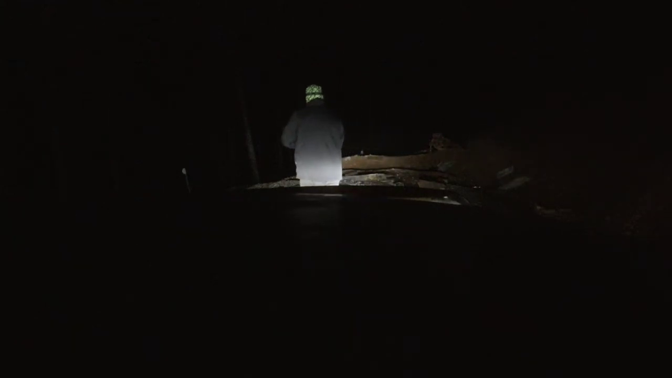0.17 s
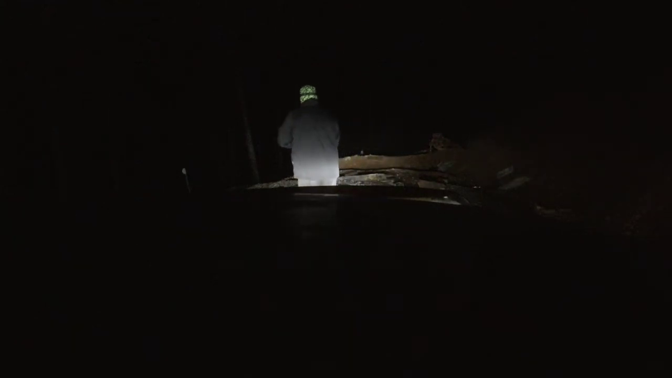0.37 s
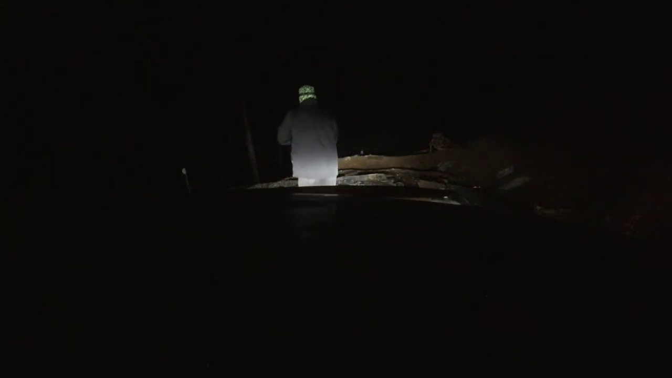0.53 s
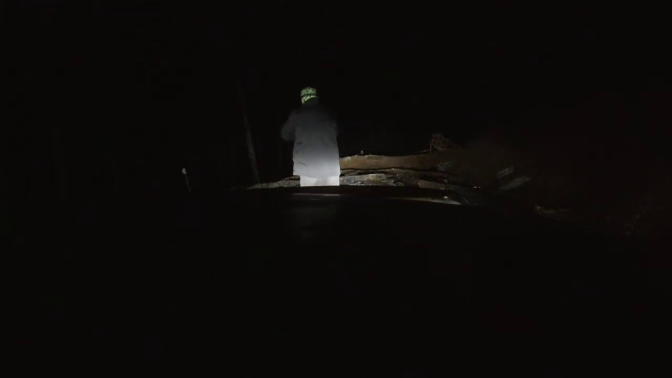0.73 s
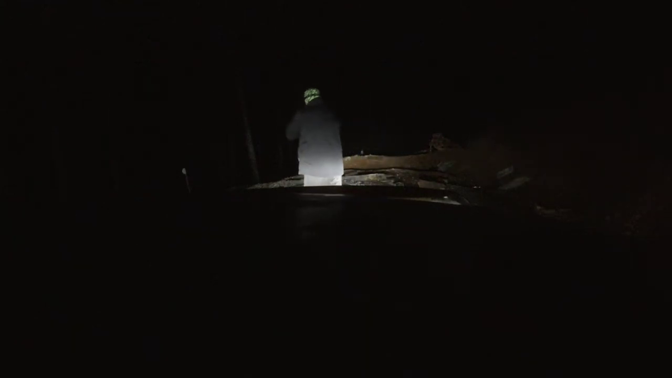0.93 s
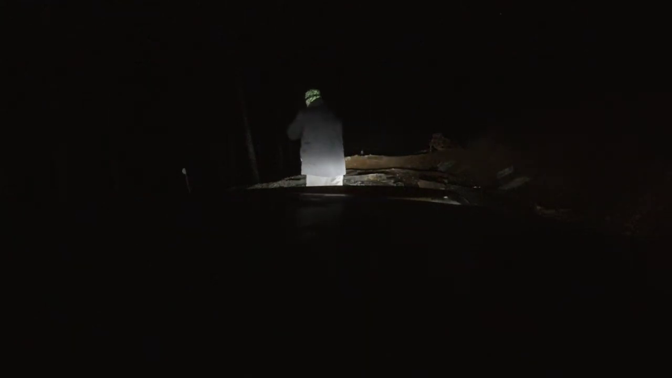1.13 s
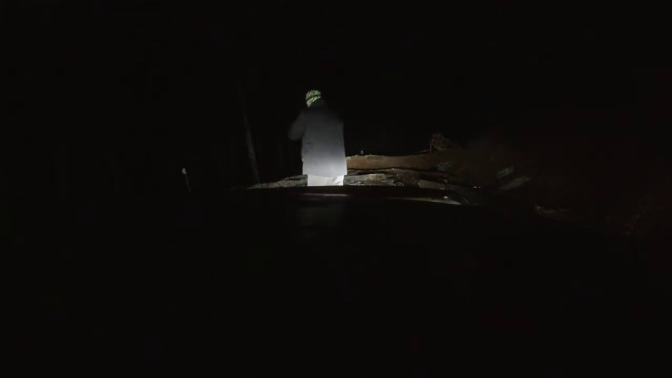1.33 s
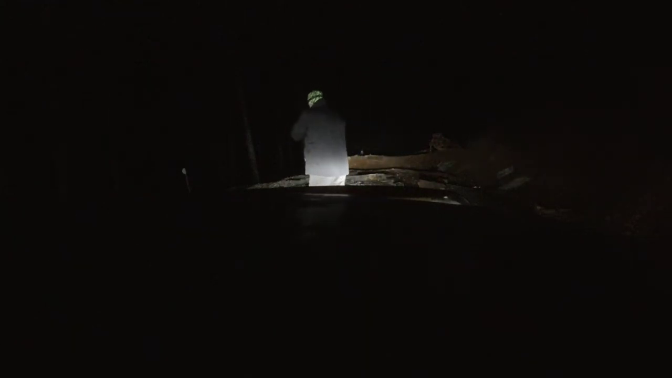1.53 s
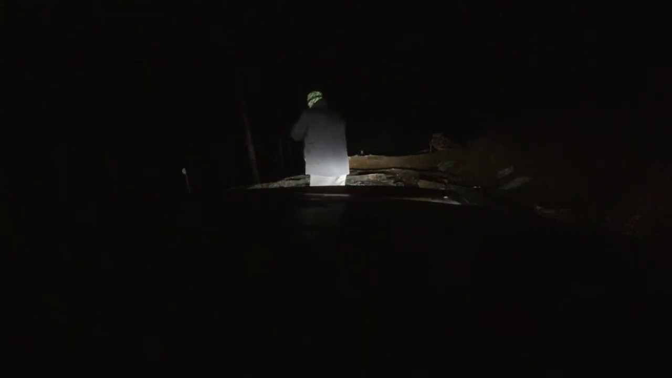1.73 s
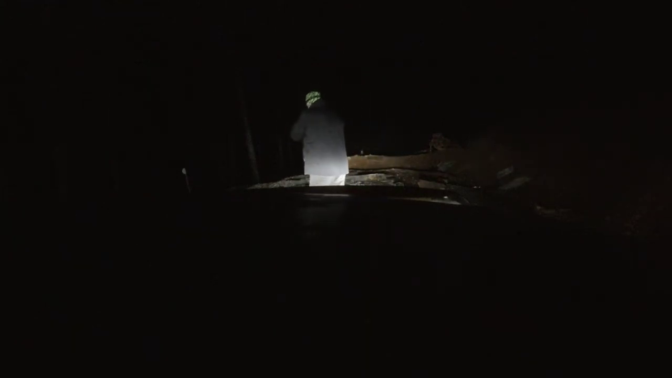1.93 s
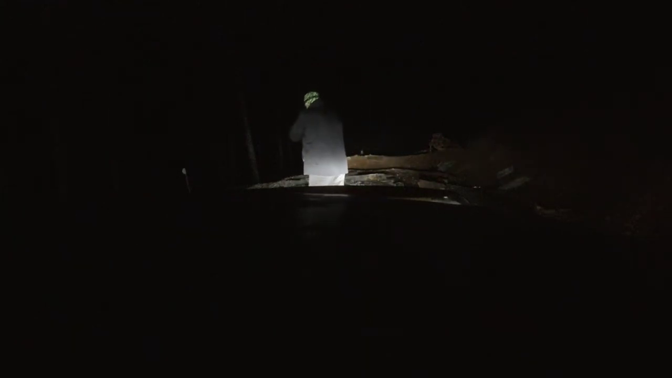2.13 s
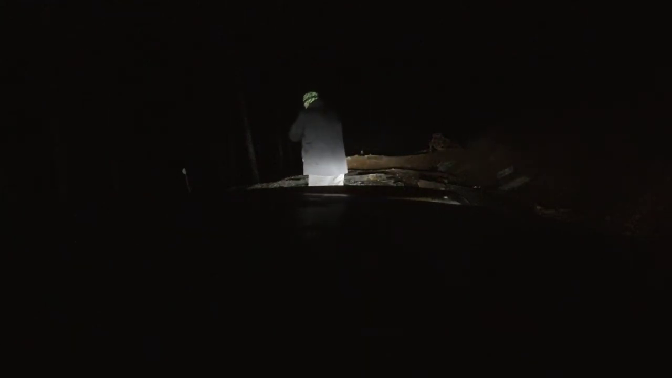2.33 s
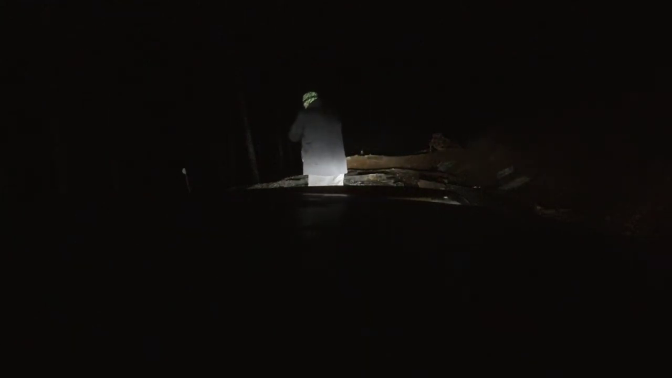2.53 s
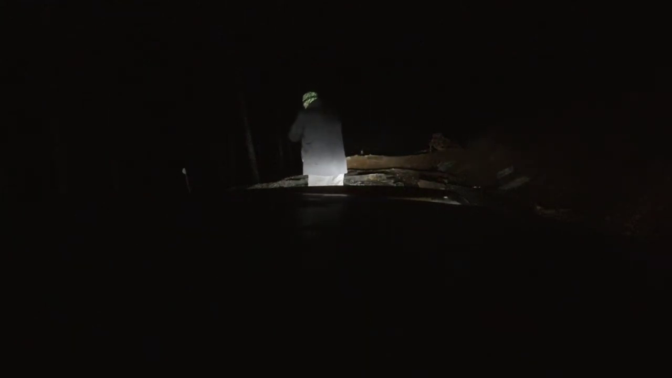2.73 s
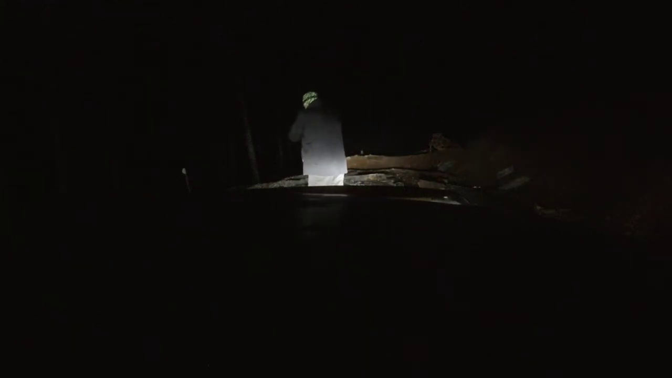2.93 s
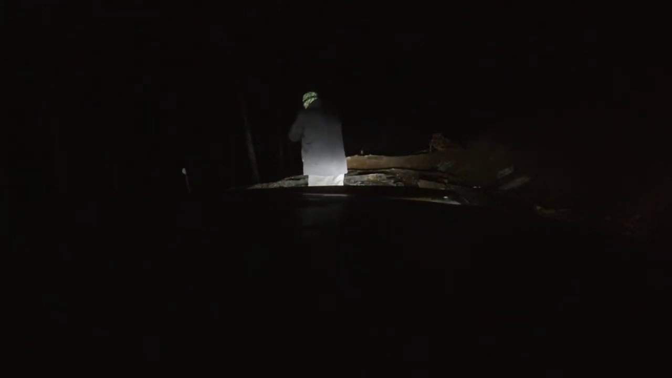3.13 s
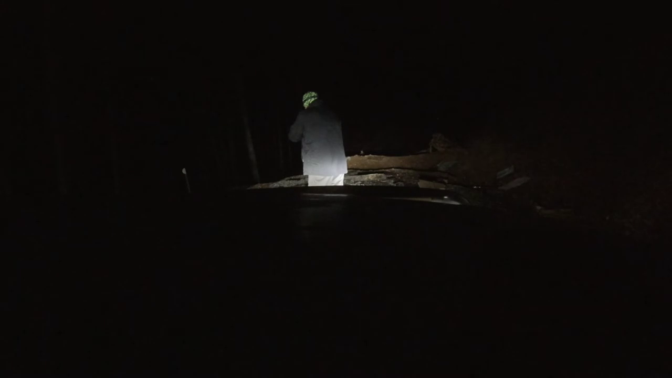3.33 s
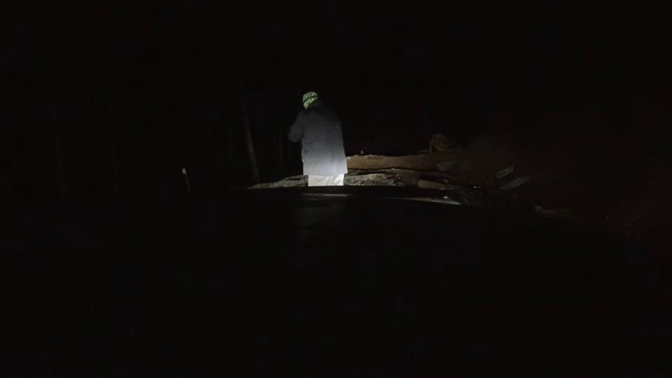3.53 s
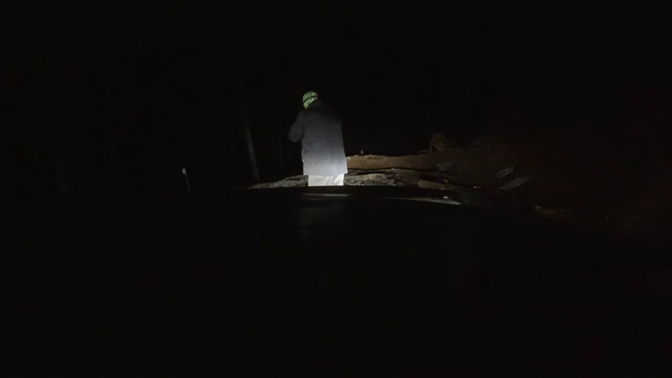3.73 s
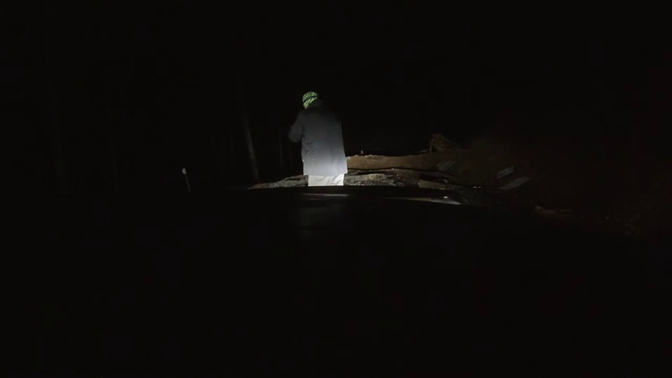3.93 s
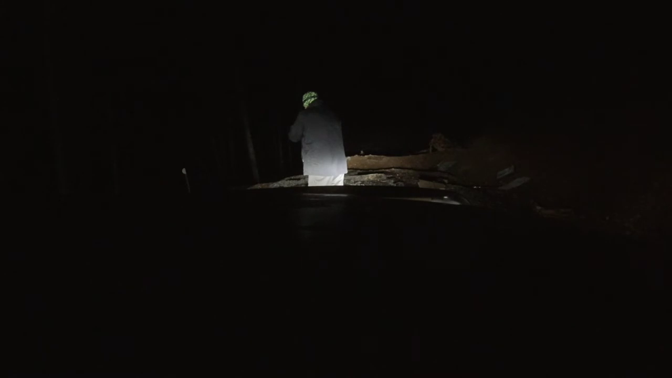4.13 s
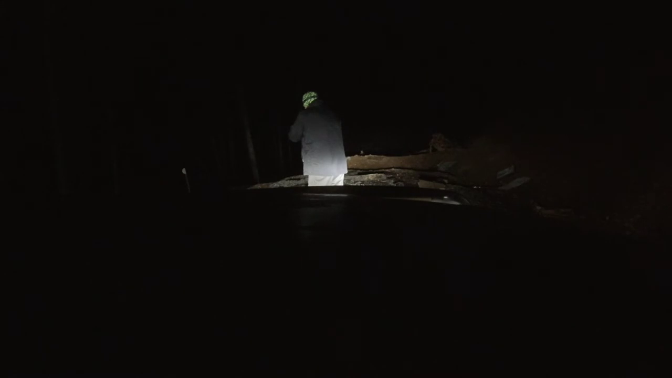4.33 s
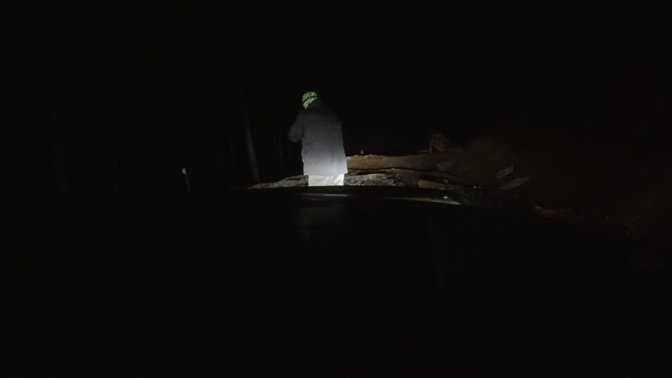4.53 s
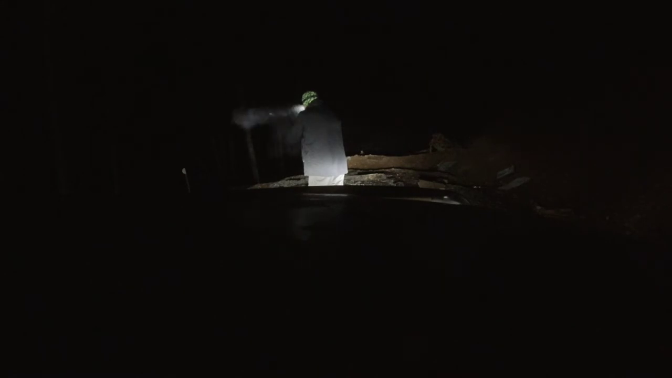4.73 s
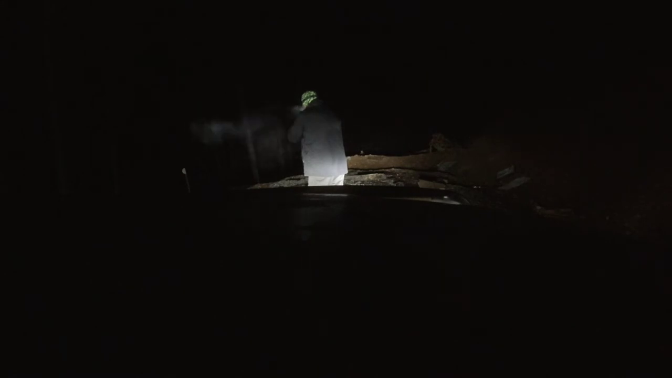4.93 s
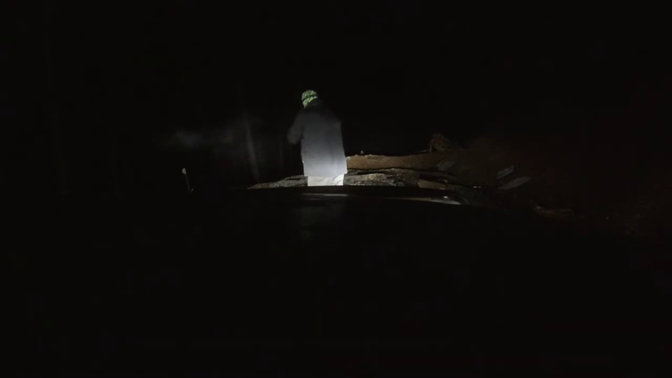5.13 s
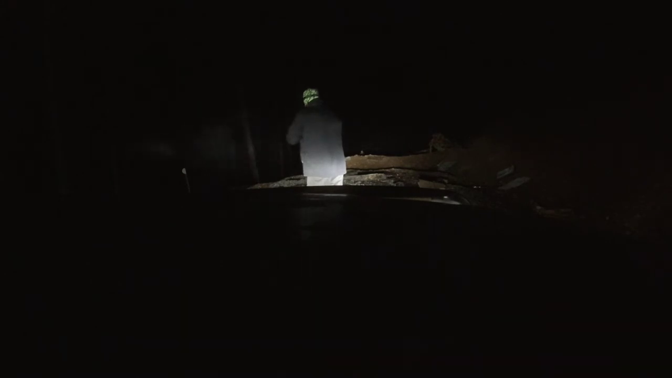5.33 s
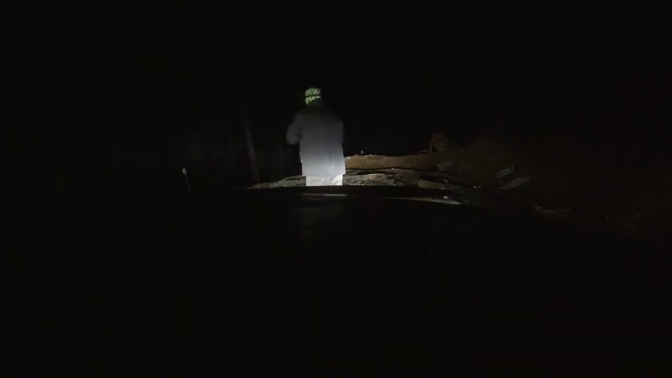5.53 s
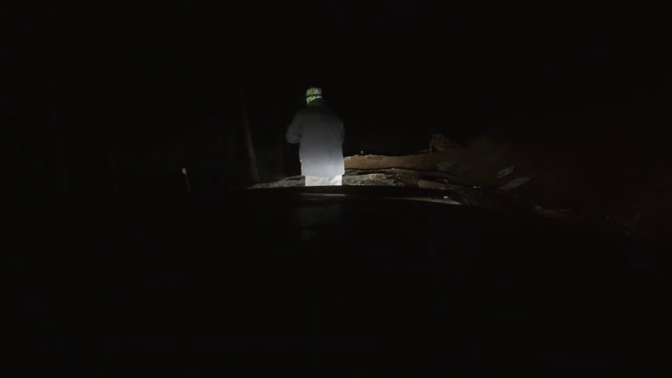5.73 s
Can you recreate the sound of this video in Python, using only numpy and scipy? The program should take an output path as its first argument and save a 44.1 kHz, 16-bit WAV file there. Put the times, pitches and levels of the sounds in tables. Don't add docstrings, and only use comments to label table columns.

```python
import sys
import numpy as np
from scipy import signal
from scipy.io import wavfile
from scipy.ndimage import uniform_filter1d

SR = 44100
rng = np.random.default_rng(int(sys.argv[2]) if len(sys.argv) > 2 else 0)


def gain_from_db(level_db):
    decades = np.asarray(level_db, float) / 20
    return 10 ** decades


def master_out(mix):
    frames = np.transpose(np.atleast_2d(mix))
    ceiling = np.clip(frames, -1, 1)
    pcm = np.round(ceiling * 32767).astype(np.int16)
    wavfile.write(sys.argv[1], SR, pcm)


N = 259749

SHOT_S = 4.6351
SPLICE_S = 3.38934
DUCK_DB = 15
SWELL_DB = 20


def evened(x):
    return x / np.sqrt(np.mean(x ** 2) + 1e-20)


def read(points, hz):
    f, value = np.transpose(points)
    return np.interp(np.log(hz + 1), np.log(f + 1), value)


def add(mix, s, sound):
    part = mix[round(s * SR):][:len(sound)]
    part += sound[:len(part)]


def pulse(colour):
    gain_db = np.maximum(read(colour, abs(np.fft.fftfreq(4096, 1 / SR))), -100)
    log_gain = np.log(gain_from_db(gain_db))
    return np.fft.ifft(np.exp(np.conj(signal.hilbert(log_gain)))).real[:2048]


def noise(db, same=0., lead=0., patchy_db=0., size=1024):
    hz = np.fft.rfftfreq(size, 1 / SR)[:, None]
    t = np.arange(4 * N // size + 5) * size / 4 / SR
    a, b, c, d, patches = rng.standard_normal((len(t), len(hz), 5)).T
    patches = uniform_filter1d(patches, size=3, axis=0)
    patches = evened(uniform_filter1d(patches, size=9, axis=1))
    left = a + 1j * b
    right = same * left + np.sqrt(1 - same ** 2) * (c + 1j * d)
    z = np.array([left, right * np.exp(-1j * lead)])
    z *= gain_from_db(db(hz, t) + patchy_db * patches)
    return evened(signal.istft(z, nperseg=size, noverlap=3 * size // 4)[1][:, :N])


def swells(t, peak_s, peak_db, rise_s, fall_s):
    u = t[:, None] - peak_s
    level_db = peak_db - SWELL_DB * np.where(u < 0, -u / rise_s, u / fall_s)
    return 10 * np.log10((gain_from_db(level_db) ** 2).sum(1) + 1e-20)


def case_ring():
    # f/Hz, level/dB, t60/s, start after the blast/ms
    modes = [
        (900, 3, .003, 0),
        (1750, 1, .012, .75),
        (2650, 0, .018, .8),
        (3500, -5, .012, .9),
        (420, 4, .055, 2.5),
        (330, -7, .05, 2.5),
        (760, -4, .03, 2.9),
    ]
    drive_db, rise_s = -3, 0.000071
    out, t = np.zeros((2, N)), np.arange(8000) / SR
    for hz, db, t60, ms in modes:
        ring = gain_from_db(db - 60 * t / t60) * np.sin(2 * np.pi * hz * t)
        ring *= gain_from_db(drive_db) * np.minimum(t / rise_s, 1)
        add(out[0], SHOT_S + ms / 1000, ring)
        add(out[1], SHOT_S + ms / 1000 + 1 / SR, ring)
    return out


def clear_echoes():
    # t/s, peak level/dB, lobe length/ms
    echoes = [(4.6538, -2.4, .82), (4.6646, -2.7, 1.43), (4.6692, -2.5, 1.18), (4.6901, -5.1, .86),
              (4.6985, -4.3, 1.16), (4.7128, -5.8, .84), (4.7459, -10, 1.04), (4.7493, -8, 1.47),
              (4.7697, -6, 1.2), (4.7814, -8, 1.34), (4.7957, -13, .77), (4.8476, -15.5, .73),
              (4.8637, -15, .95), (4.8765, -17, 1.68), (4.8873, -13.5, 1.43), (4.8987, -15, .7),
              (4.9429, -18.5, 1.0), (4.9504, -14, .29), (4.9716, -14, 1.2), (4.9748, -17, 1.0),
              (4.9848, -18.5, .8)]
    suction_s, left_lead = .08, 4
    out, t = np.zeros((2, N)), np.arange(800) / SR
    for s, db, ms in echoes:
        lobe = -1 if s - SHOT_S < suction_s or ms < .4 else 1
        u = lobe * (t - 400 / SR) / (ms / 1000)
        push = 1.25 * np.exp(-abs(u) * 3.5)
        suction = .65 * np.exp(-((u - 1.2) / .65) ** 2)
        wave = lobe * gain_from_db(db) * (push - suction)
        add(out[0], s - 402 / SR, wave)
        add(out[1], s - (402 - left_lead) / SR, wave)
    return signal.sosfiltfilt(signal.butter(2, 4500, fs=SR, output="sos"), out)


def bullet_strike():
    # t/s, peak level/dB, f/Hz, t60/s, spread either side/octaves
    bursts = [
        (4.9368, -24.5, 3700, 0.039, 0.61),
        (4.9372, -42, 9800, 0.025, 0.16),
        (4.9495, -14.5, 2470, 0.0077, 0.36),
        (4.952, -23.5, 3000, 0.047, 0.43),
        (4.9500, -39.5, 10000, 0.041, .2),
    ]
    out, t = np.zeros((2, N)), np.arange(2000) / SR
    for s, db, hz, t60, octaves in bursts:
        grit = rng.standard_normal((2, 2000)) * gain_from_db(-60 * t / t60) * np.minimum(t / 0.00018, 1)
        grit = grit + .7 * grit[::-1]
        band = hz * 2 ** np.array([-octaves, octaves])
        grit = signal.sosfilt(signal.butter(3, band, "band", fs=SR, output="sos"), grit)
        for port in (0, 1):
            add(out[port], s, gain_from_db(db) * grit[port] / abs(grit).max())
    return out


def blast():
    out = case_ring() + clear_echoes() + bullet_strike()
    return signal.sosfilt(signal.butter(2, 60, "high", fs=SR, output="sos"), out)


def scatter(per_s, spread_db, colour, signed, width):
    crowding = 17
    chance, size, side, sign = rng.random((N, 4)).T
    crowd = 1 + crowding * np.maximum(np.arange(N) / SR - SHOT_S - .25, 0)
    density = np.minimum(per_s * crowd / SR, .3)
    at = np.flatnonzero((chance < density)[:-40])
    size = gain_from_db(-spread_db * np.log(1 - .98 * size[at])) * np.where(sign[at] < signed, -1, 1)
    size /= np.sqrt(density[at])
    lag = np.round(2.5 + width * (side[at] - .5)).astype(int)
    taps = np.zeros((2, N))
    taps[0, at + 20] = size
    np.add.at(taps[1], at + 20 + lag, size)
    return evened(signal.oaconvolve(taps, pulse(colour)[None])[:, :N])


def through_air(x):
    air_db_per_s = 72
    hz, t, z = signal.stft(x, SR, nperseg=256)
    loss_db = air_db_per_s * ((hz[:, None] / 10000) ** 1.12 - .15) * np.maximum(t - SHOT_S - .05, 0)
    return signal.istft(z * gain_from_db(-loss_db), SR, nperseg=256)[1][:, :N]


def ragged(x):
    drop_db, drop_hz = -100.5, 4200
    hz, _, z = signal.stft(x, SR, nperseg=1024)
    patch_db = 10 * np.log10(uniform_filter1d((abs(z) ** 2).mean(0), size=8, axis=0) + 1e-20)
    keep = (patch_db > drop_db) | (hz[:, None] < drop_hz)
    return signal.istft(z * keep, SR, nperseg=1024)[1][:, :N]


def wood():
    # peak t/s, trunk level/dB, swell/s, t60/s, leaves over trunks level/dB
    stands = [
        (4.668, -9, .6, 0.33, -8),
        (4.761, -24, 0.12, 1.22, -6),
        (4.87, -30.5, .1, 0.39, -2),
        (4.975, -30, 0.026, 0.35, -8.5),
        (5.1, -40.5, .3, 2.3, -12.5),
        (5.42, -50.5, 1.5, 0.78, 2.5),
        (5.43, -38.5, .15, 0.55, -23),
        (5.51, -42, .1, 0.48, -20),
        (5.6, -47.5, 0.088, 1.3, -11),
    ]
    # f/Hz, level/dB per Hz
    trunk_colour = [(47, -34.5), (80, -21.5), (134, -2), (205, -3.5), (246, 0), (308, -1.5), (689, -5),
                    (3000, -28.5), (3900, -59), (6600, -120)]
    # f/Hz, level/dB per Hz
    leaf_colour = [(710, -15), (1200, -10), (1590, -5), (1810, -9.5), (2760, -9), (4130, -12.5),
                   (6650, -24.5), (10100, -15), (14800, -21), (16000, -23.5)]
    boom_db, boom_lag_s, boom_fade_db_per_s = -7, 0.041, 20.5
    wood_end_s, leaf_end_db_per_s = 5.61, 88
    s, db, rise, t60, leafy_db = np.transpose(stands)
    t, fall = np.arange(N) / SR, t60 * SWELL_DB / 60
    since = np.maximum(t - SHOT_S, 0)

    trunks = scatter(700, 3.5, trunk_colour, .35, 14)
    trunks *= gain_from_db(swells(t, s, db, rise, fall) + 0.5)

    leaf_level_db = swells(t, s, db + leafy_db, rise, fall)
    leaf_level_db -= leaf_end_db_per_s * np.maximum(t - wood_end_s, 0)
    leaves = scatter(9000, 2.2, leaf_colour, .45, 11)
    leaves = ragged(through_air(leaves) * gain_from_db(leaf_level_db + 4.0))

    boom_level_db = swells(t - boom_lag_s, s, db, np.minimum(rise, .2), fall)
    boom_level_db += boom_db - boom_fade_db_per_s * since
    boom = noise(lambda hz, _: -8.0 * np.log2((hz + 5) / 120) ** 2, same=0.79, size=2048)
    boom *= gain_from_db(boom_level_db - 9.0)

    leaf_onset = (.3 + .7 * np.minimum(since / .014, 1)) * (since > 0)
    return (trunks + boom) * np.minimum(since / .012, 1) + leaves * leaf_onset


def slow_waver(low_hz, top_hz):
    t = np.arange(N) / SR
    return evened(sum(np.sin(2 * np.pi * (f * t + rng.random())) for f in np.geomspace(low_hz, top_hz, 12)))


def hum():
    # f/Hz, rms level/dB
    tones = [
        (190.5, -42),
        (381, -58),
        (762, -70),
    ]
    beat_hz, below_db, above_db = 14, -17.5, -18.5
    t = np.arange(N) / SR
    drift, throb = slow_waver(.2, 1.2), slow_waver(1.5, 10)
    turn = .12 * drift - .55 * np.clip((t - SPLICE_S) * 100, 0, 1)
    beat = np.exp(2j * np.pi * (beat_hz * t + 0.2 * drift))
    sides = 1 + gain_from_db(above_db) * beat + gain_from_db(below_db) / beat
    tone = np.zeros(N)
    for hz, db in tones:
        carrier = np.exp(2j * np.pi * hz * (t + turn / tones[0][0]))
        tone += np.sqrt(2) * gain_from_db(db) * (sides * carrier).imag
    return tone * gain_from_db(0.87 * throb + 0.44 * (t - 0.5)) * np.ones((2, 1))


def leaf_stirs():
    # t/s, level/dB, length/s
    rustles = [
        (.18, -71, .022),
        (.85, -77, .03),
        (1.08, -75, .02),
        (2.43, -77, .03),
        (4.17, -77, .03),
    ]
    t = np.arange(N) / SR
    stir = noise(lambda f, _: -40 * np.log2((f + 5) / 3900) ** 2, same=.4, size=256)
    return stir * sum(gain_from_db(db) * np.exp(-((t - s) / length) ** 2) for s, db, length in rustles)


def road():
    # t/s, level/dB
    traffic = [
        (0.0, -66),
        (0.02, -65.5),
        (2.28, -71.5),
        (2.44, -68),
        (4.44, -71.5),
        (4.5, -77),
    ]
    # f/Hz, level/dB per Hz
    wash = [(250, -38), (420, -6.5), (478, -3.5), (766, -2), (1060, -3.5), (1430, -10), (2160, -13.5),
            (5400, -43.5), (7000, -57.5), (9100, -85), (15400, -120)]
    # f/Hz, likeness
    likeness = [(60, 0.14), (180, 0.68), (550, 0.98), (1650, 0.68), (4970, -0.33), (15000, -0.59)]
    # f/Hz, lead/rad
    port_lead = [(100, 0.023), (1300, 0.15), (3400, 0.04), (6500, 0.02)]
    road_db, body_share, fizz_share, rise_db_per_s = -49, 0.1, 0.96, 0.75
    s, near_db = np.transpose(traffic)
    body_db = body_share * near_db + rise_db_per_s * s
    fizz_db = fizz_share * (near_db - near_db.mean())
    colour = [(100, -7.5), (260, -6.5)] + wash[1:]
    hz = np.fft.rfftfreq(1024, 1 / SR)[:, None]
    same = np.clip(read(likeness, hz), -1, 1)
    bright = np.clip((hz - 1800) / 2000, 0, 1)

    def field(f, t):
        return read(colour, f) + np.interp(t, s, body_db) + bright * np.interp(t, s, fizz_db)

    return gain_from_db(road_db) * noise(field, same, read(port_lead, hz), patchy_db=2.1)


def wind():
    # peak t/s, rumble level/dB, swell/s, flutter over rumble level/dB
    gusts = [(.19, -42.5, .1, -7), (.3, -47, 0.13, -8), (.46, -42, 0.083, -13), (.72, -50.5, 0.11, -12),
             (.93, -38, 0.36, -13), (1.06, -37, 0.067, -8), (1.24, -33.5, 0.079, -6),
             (1.5, -35.5, .15, -7.5), (1.65, -50.5, 0.077, 4), (1.79, -41.5, 0.22, -11),
             (1.97, -42.5, 0.18, -16), (2.24, -54.5, 0.15, 0.5), (2.36, -42, 0.059, -23),
             (2.55, -47, 0.092, -6), (2.7, -37.5, 0.22, -10.5), (3.07, -41.5, 0.09, -1.5),
             (3.19, -42, 0.27, -22.5), (3.3, -38.5, 0.13, -22), (3.459, -40, 0.21, -1),
             (3.6, -35.5, 0.32, -8.5), (3.73, -22, 0.086, -17.5), (3.83, -27, 0.035, -25),
             (3.961, -36, 0.51, -3.5), (4.27, -39, 0.26, 0.5), (4.36, -42, .1, 3.5),
             (4.47, -36.5, 0.13, -18), (5.21, -40, 0.21, -19.5), (5.41, -38, 0.2, -14),
             (5.69, -37, 0.15, -25)]
    # f/Hz, level/dB per Hz
    rumble_colour = [(8.8, -31.5), (15, 6), (41, -4.5), (57, -0.5), (124, -16.5), (160, -21.5),
                     (210, -38.5), (350, -120)]
    # f/Hz, level/dB per Hz
    flutter_colour = [(30, -24), (90, 8), (130, 3), (200, 9.5), (320, -6), (480, -37.5), (1500, -130)]
    breeze_db, breeze_flutter_db, calm_db = -57.5, -12.5, -9
    gust_fall, flutter_length = 1.2, 1
    s, db, rise, flutter_db = np.transpose(gusts)
    flutter_rise = flutter_length * rise
    t = np.arange(N) / SR
    breeze = gain_from_db(breeze_db + calm_db * (t > SHOT_S))
    rumble = noise(lambda hz, _: read(rumble_colour, hz), same=0.05, size=4096)
    rumble *= breeze + gain_from_db(swells(t, s, db, rise, gust_fall * rise))
    flutter = noise(lambda hz, _: read(flutter_colour, hz), same=0.094, size=2048)
    flutter_gusts = gain_from_db(swells(t, s, db + flutter_db, flutter_rise, gust_fall * flutter_rise))
    flutter *= breeze * gain_from_db(breeze_flutter_db) + flutter_gusts
    lumps_db = 2.0 * noise(lambda hz, _: -3.0 * hz, same=0.27, size=4096)
    return gain_from_db(lumps_db) * (rumble + flutter)


def preamp_hiss():
    # f/Hz, level/dB per Hz
    colour = [(3530, -25.5), (5500, -8), (7500, -6), (9000, -2.5), (12700, -4), (12900, -12.5),
              (16000, -17)]
    return gain_from_db(-89) * noise(lambda hz, _: read(colour, hz), same=.4, patchy_db=1.2)


def scene():
    hiss = preamp_hiss()
    shot = gain_from_db(DUCK_DB) * (blast() + wood())
    return shot + hum() + leaf_stirs() + road() + wind() + hiss


def ducked(dry):
    power_db = 10 * np.log10(abs(uniform_filter1d((dry ** 2).mean(0), 44)) + 1e-12)
    loud = np.maximum.accumulate(np.clip((power_db + 18) / 10, 0, 1))
    return .8 * np.tanh(dry / gain_from_db(DUCK_DB * loud) / .8)


def swell_ahead(flat):
    # f/Hz, level/dB per Hz
    rush_colour = [(120, -29.5), (200, -2), (1840, -8.5), (2130, -10.5), (2610, -5), (8270, -29),
                   (14900, -16), (16000, -28)]
    level_db, slope_db_per_ms, reach_ms, fade_ms = -26, .8, 38, 12
    t = np.arange(N) / SR
    early_ms = 1000 * (SHOT_S - t)
    dropout = np.clip((t - SHOT_S + 0.022) / 0.0084, 0, .93) * (t < SHOT_S)
    rush = noise(lambda hz, _: read(rush_colour, hz), same=0.23, patchy_db=0.5, size=256)
    rush *= gain_from_db(level_db - slope_db_per_ms * abs(early_ms)) * (early_ms > -1)
    rush *= np.clip((reach_ms - early_ms) / fade_ms, 0, 1) ** 2
    return flat * (1 - dropout) + rush


def roll_off(x):
    return signal.sosfilt(signal.butter(12, 16360, fs=SR, output="sos"), x)


def record(dry):
    splice_step = [-.027, -.004]
    t = np.arange(N) / SR
    band_limit = signal.firwin(255, 15650, window=("kaiser", 8), fs=SR)
    camera = signal.oaconvolve(swell_ahead(ducked(dry)), band_limit[None], "same")
    step = (t > SPLICE_S) * np.exp(-np.maximum(t - SPLICE_S, 0) / .0005)
    return roll_off(camera + np.array(splice_step)[:, None] * step)


dry = scene()
out = record(dry)
master_out(out)
```